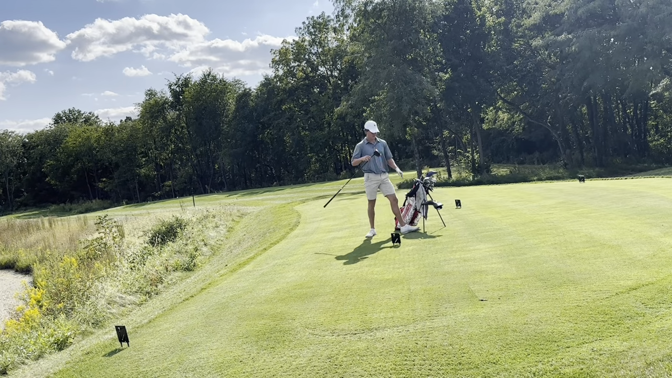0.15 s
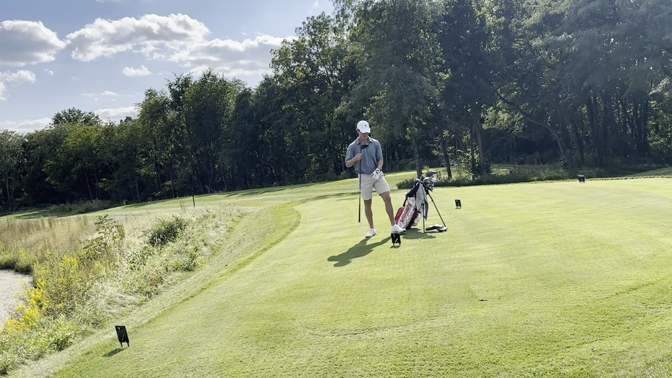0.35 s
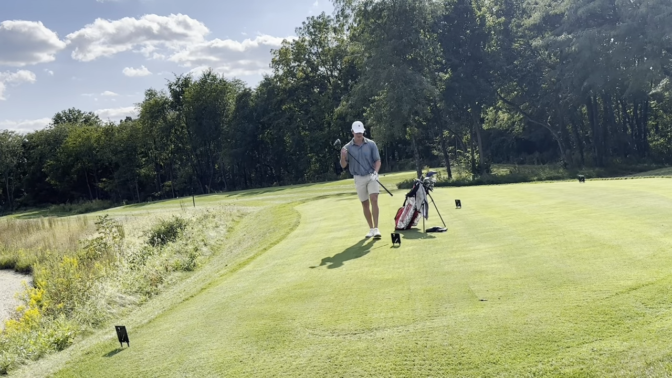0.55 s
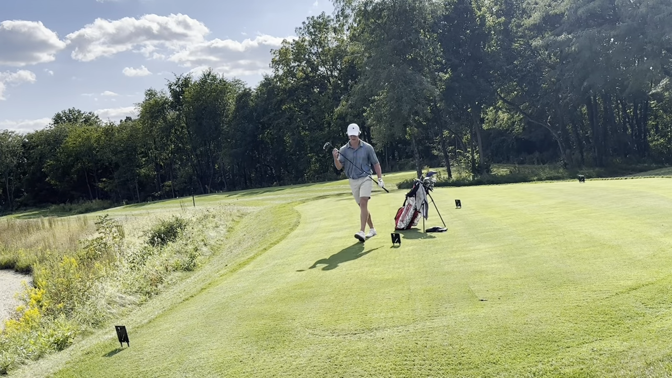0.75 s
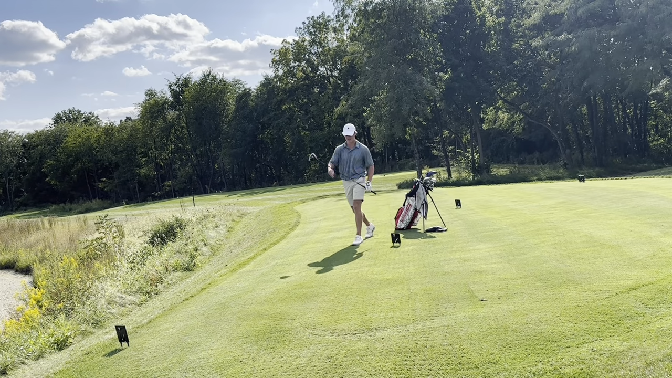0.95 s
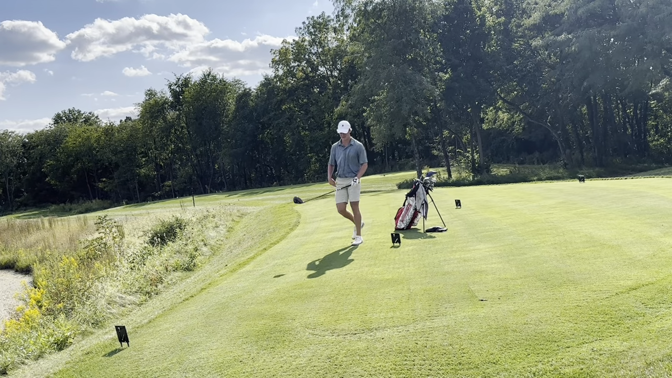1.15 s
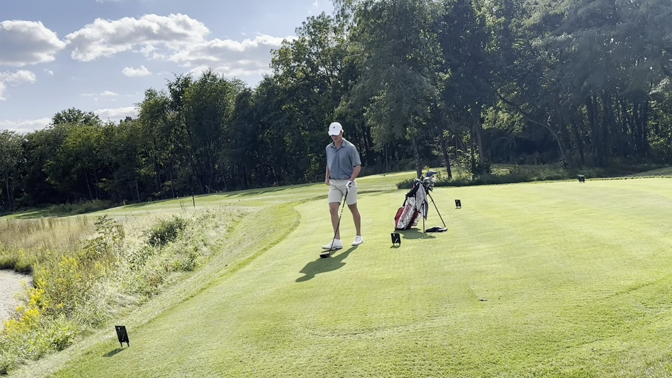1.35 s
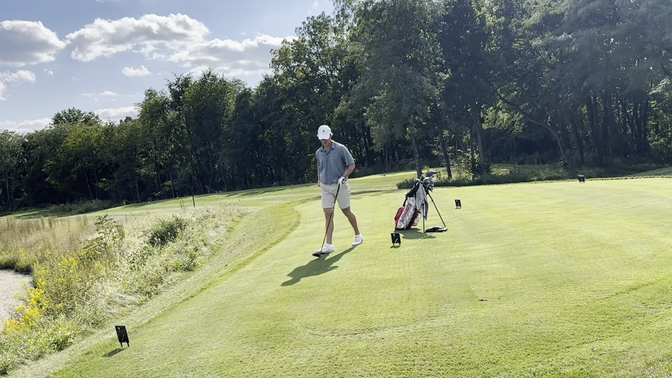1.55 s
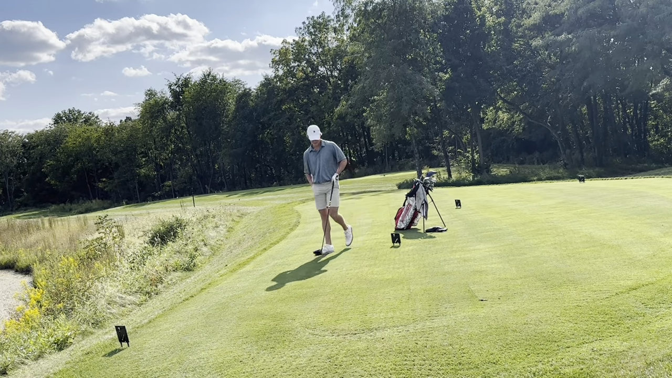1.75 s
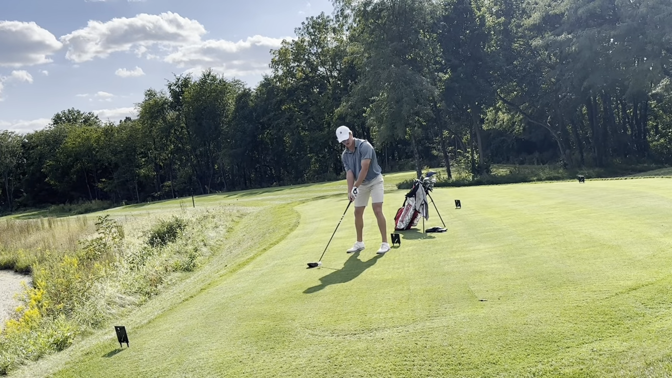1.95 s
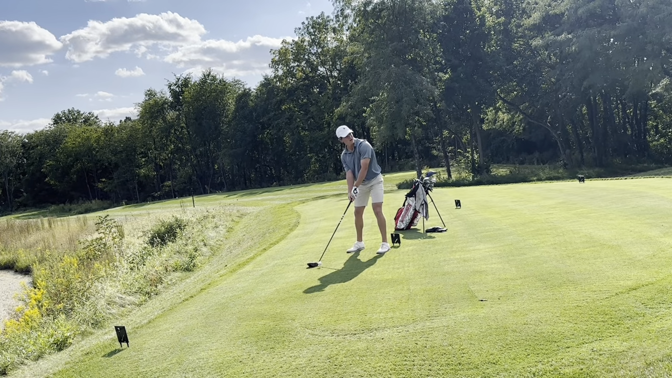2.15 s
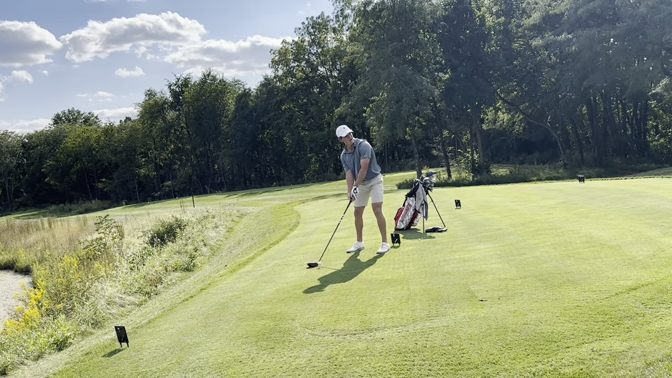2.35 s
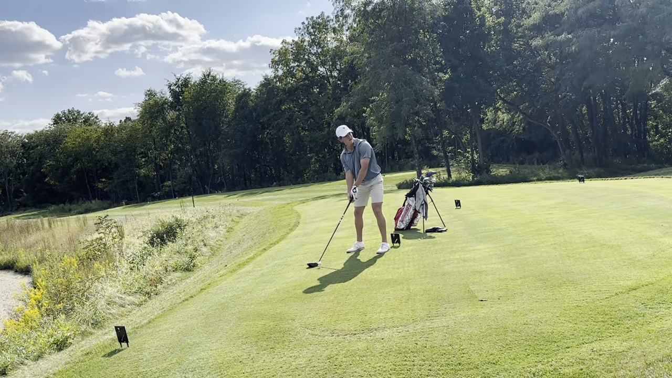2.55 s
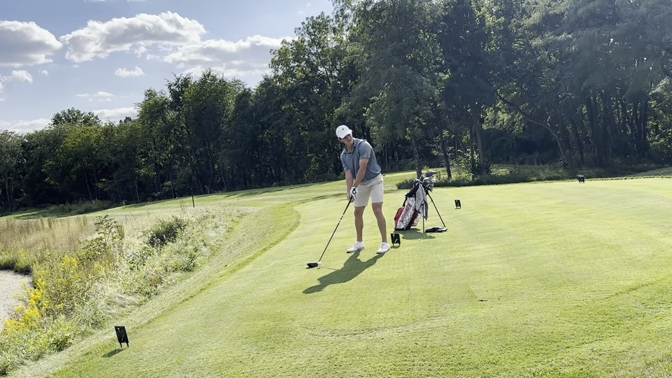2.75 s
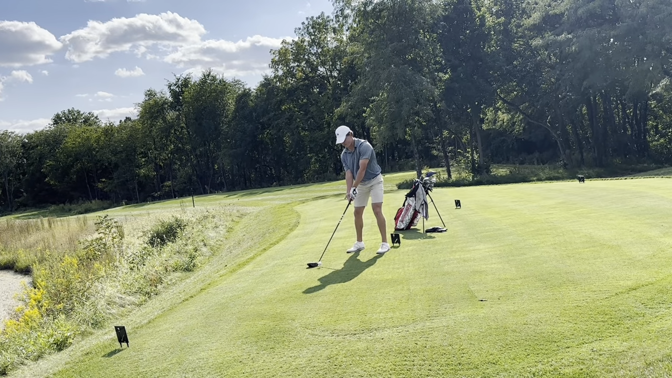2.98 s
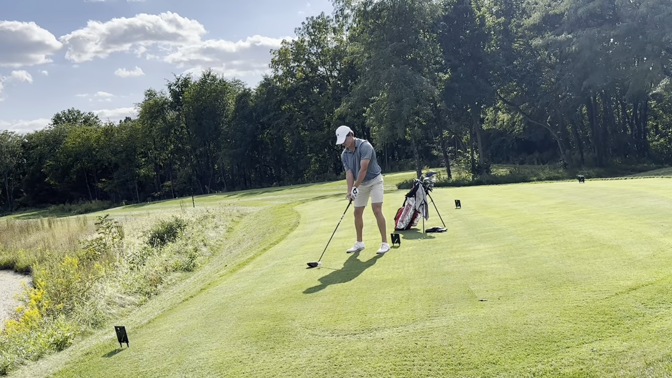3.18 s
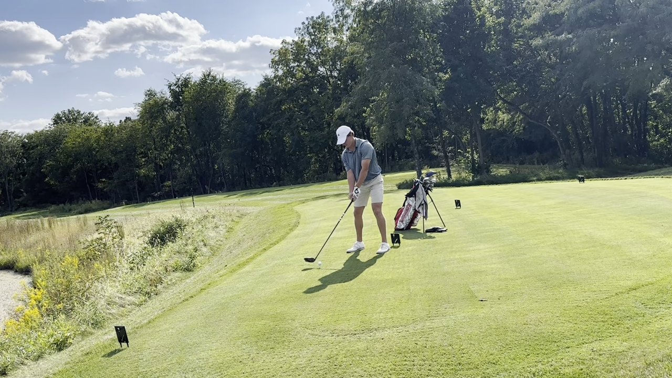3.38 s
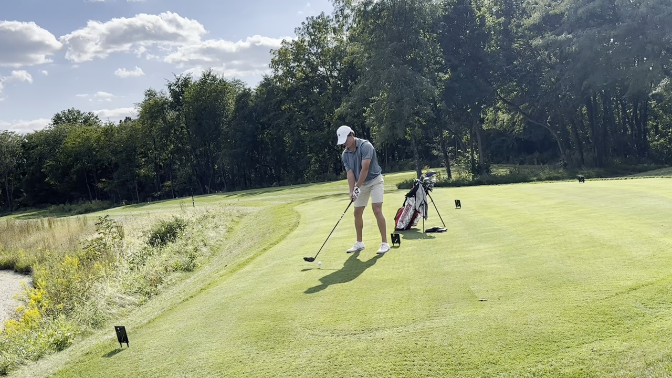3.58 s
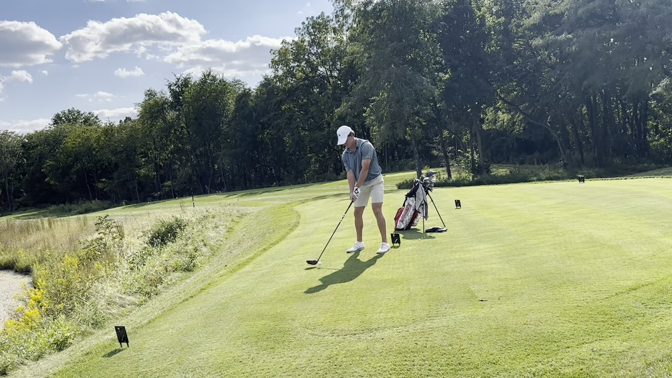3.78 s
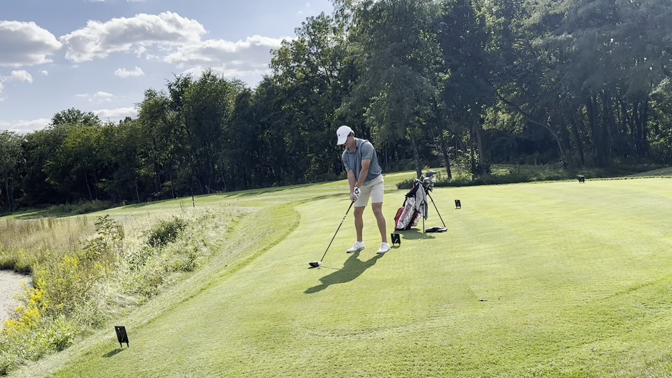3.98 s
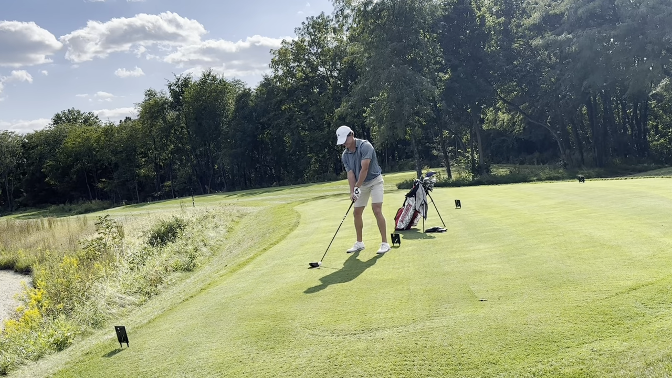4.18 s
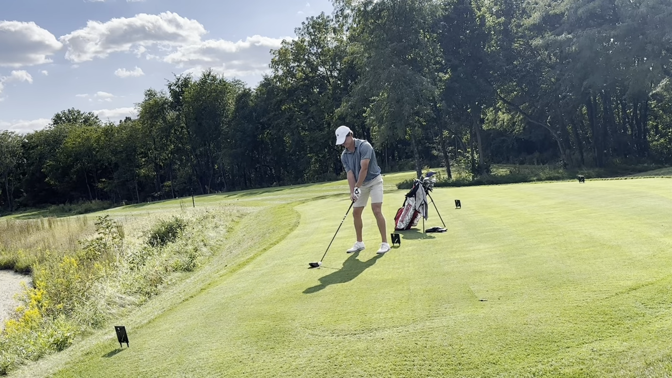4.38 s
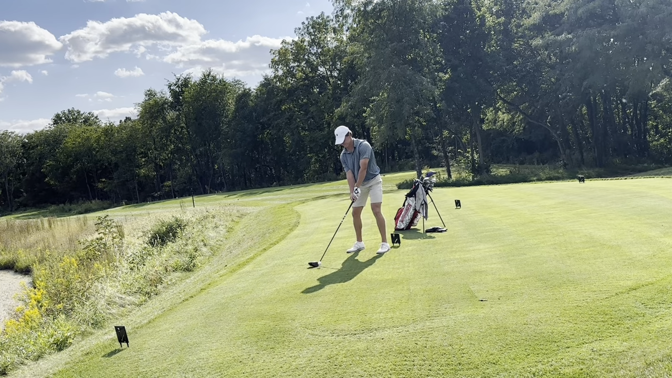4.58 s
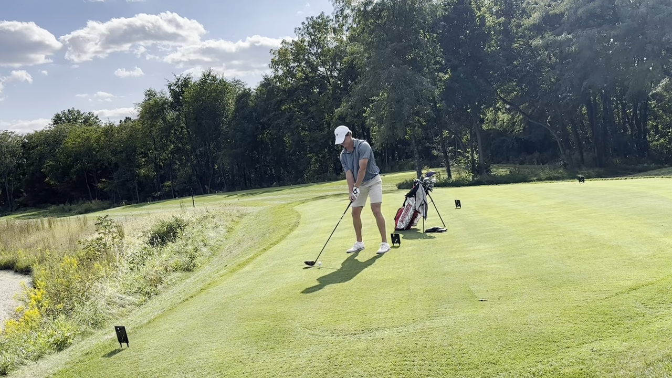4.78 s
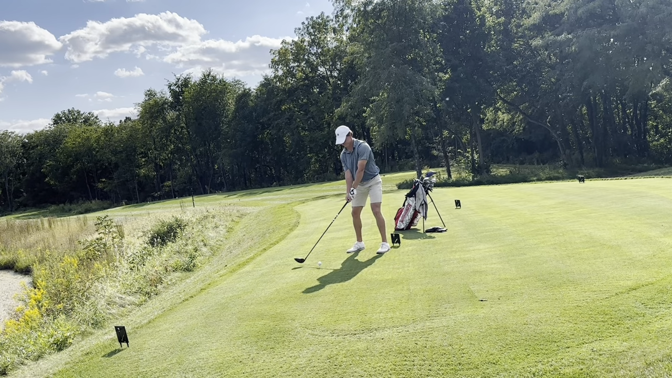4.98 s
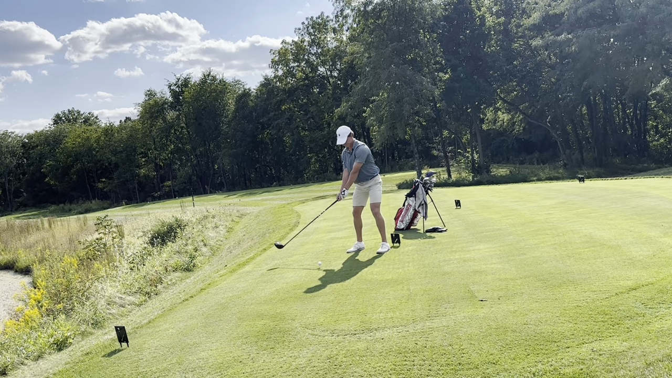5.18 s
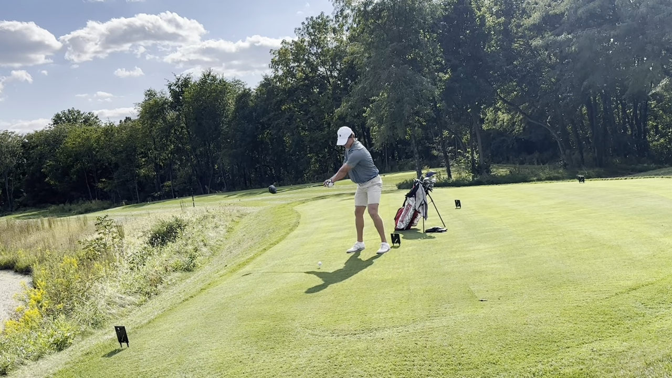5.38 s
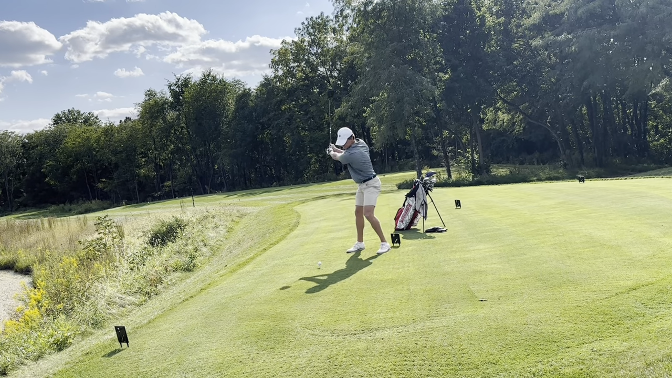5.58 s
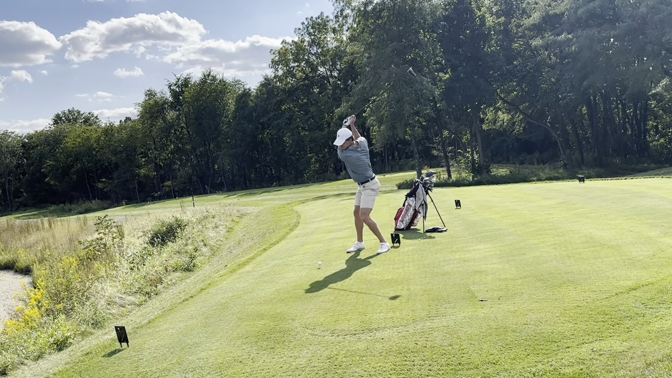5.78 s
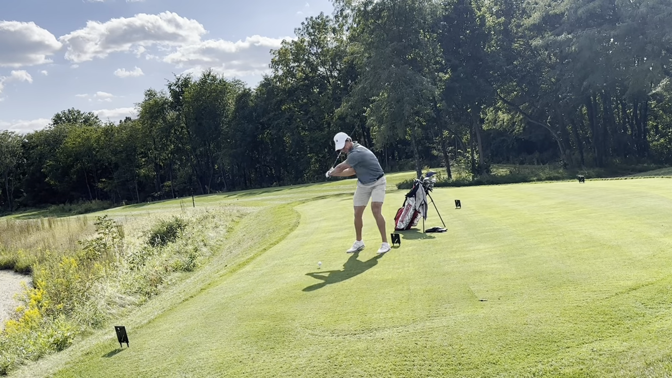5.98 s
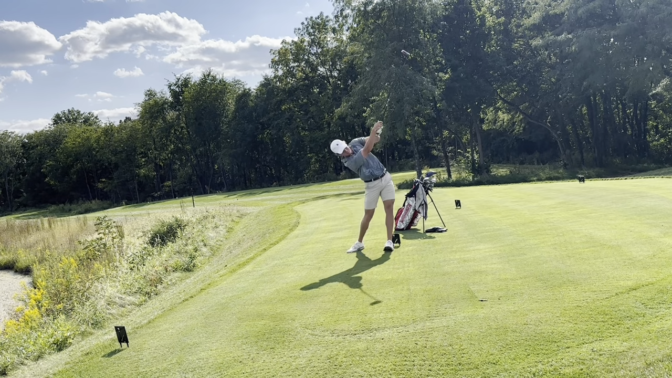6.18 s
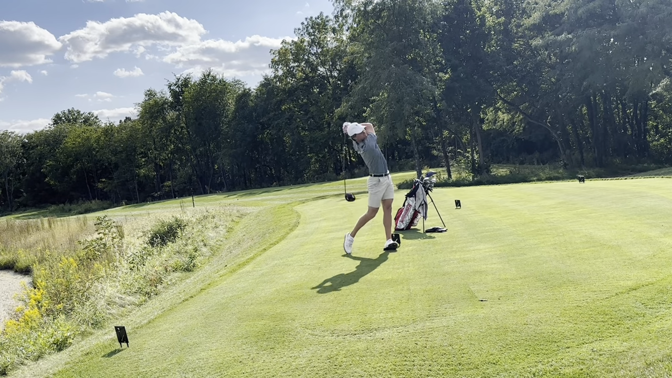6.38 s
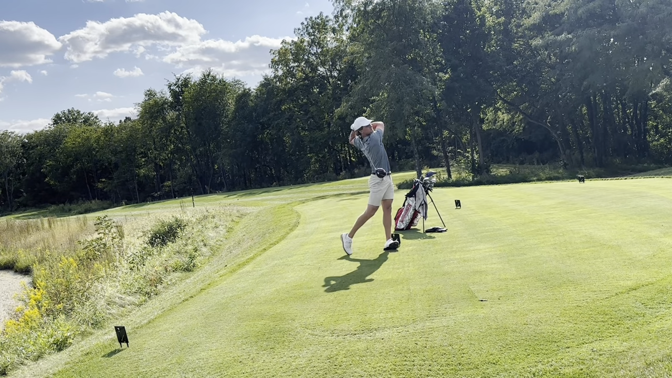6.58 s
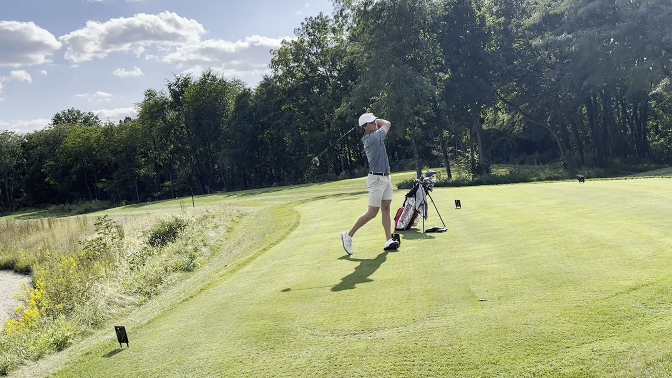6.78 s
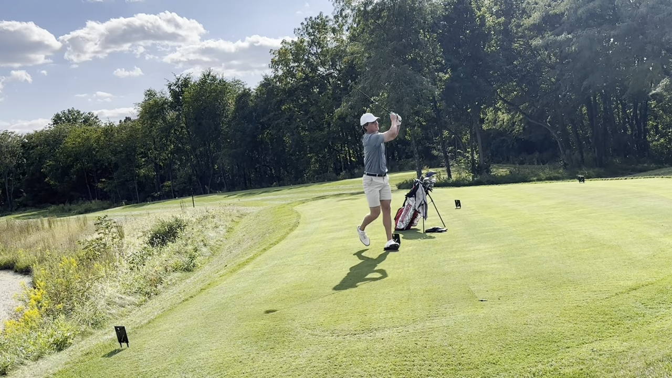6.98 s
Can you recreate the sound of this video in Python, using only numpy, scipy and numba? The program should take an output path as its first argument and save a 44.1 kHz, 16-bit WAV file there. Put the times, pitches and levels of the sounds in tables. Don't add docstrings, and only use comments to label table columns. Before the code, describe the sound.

A quiet, sunny tee box heard in stereo from some metres away. From 0 s, faint hiss and far traffic lie under high crickets: a steady trill, quick repeated chirps and a distant chorus. Soft low wind bumps and flutters press on the microphone, most crowded in the first second. Tiny dry scuffs and ticks from bag and clubs come at about 0.3, 0.7, 1.25 and 1.35 s. At 1.85 s the sound dips for an instant and the trilling changes. Gusts thump near 2.2 and 4.8 to 5 s; leaves hiss slightly brighter around 3.8 s. A stronger rumble swells at 5.9 s. At about 6.03 s a short swish rises in pitch, and at 6.08 s the driver cracks the ball: very loud, sharp, bright and hollow-metallic, gone in milliseconds. A diffuse echo returns from banks and trees for a few tenths, leaving a faint tail, crickets and gusts until 7 s.

```python
import sys
import numpy as np
from scipy import signal
from scipy.fft import rfft, irfft, next_fast_len
from scipy.io import wavfile
from numba import njit

SR = 44100
rng = np.random.default_rng(int(sys.argv[2]) if len(sys.argv) > 2 else 0)


def wav_record(signal):
    frames = np.transpose(np.atleast_2d(signal))
    bounded = np.clip(frames, -1, 1)
    quanta = np.round(bounded * 32767).astype(np.int16)
    wavfile.write(sys.argv[1], SR, quanta)


def elevation(decibels):
    levels = np.asarray(decibels, float)
    return 10 ** (levels / 20)


N = 310023
IMPACT_S = 6.0835


def in_time(rows):
    s, *columns = np.transpose(rows)
    return [np.interp(np.arange(N) / SR, s, c) for c in columns]


def rms_one(x):
    return x / np.sqrt(np.mean(x ** 2) + 1e-20)


def coloured(spectrum, channels=1):
    hz, db = np.transpose(spectrum)
    size = next_fast_len(N)
    log_bins = np.log(np.arange(size // 2 + 1) * SR / size + 1)
    gain = elevation(np.interp(log_bins, np.log(hz), db, left=-90, right=-90))
    white = rng.standard_normal((channels, size))
    return rms_one(irfft(rfft(white) * gain, size)[:, :N])


def drift(rate):
    r = np.exp(-80 * np.pi * rate / SR)
    steps = rng.standard_normal(N // 40 + 2002)
    slow = signal.lfilter([1], [1, -2 * r, r * r], steps)[2000:]
    return np.interp(np.arange(N) / 40, np.arange(len(slow)), rms_one(slow))


def glides(rows, bend):
    out = np.zeros(N)
    for start, length, first_hz, last_hz, db in rows:
        u = np.arange(int(length * SR)) / (length * SR)
        pitch = last_hz + (first_hz - last_hz) * (1 - u) ** bend
        shape = np.minimum(u / .12, 1) * (1 - u) ** .8
        tone = np.sin(2 * np.pi * np.cumsum(pitch) / SR)
        out[int(start * SR):][:len(u)] += elevation(db) * shape * tone
    return out


def mid_side(mid, side):
    return np.array([mid + side, mid - side])


# frequency in Hz, level in dB.
PORT_DIFFERENCE = [(60, -4.5), (700, 0.5), (2300, -13.5), (4000, 6), (6000, -13.5), (8200, 9.5),
                   (10200, -3.5), (12000, -16), (14500, 0), (17000, -3)]


def housing(side, lag=None):
    hz, db = np.transpose(PORT_DIFFERENCE)
    size = next_fast_len(N, True)
    bins = np.arange(size // 2 + 1) / size
    turn = 1 if lag is None else -1j * np.sin(np.pi * bins * lag)
    colour = elevation(np.interp(np.log(bins * SR + 1), np.log(hz), db))
    return irfft(turn * colour * rfft(side, size), size)[:N]


def ports(x, lag):
    return mid_side(x, housing(x, lag))


# frequency in Hz, level in dB per Hz.
AIR_COMMON = [(35, -29), (60, -9.5), (315, -9.5), (605, -9), (1140, -22), (2460, -29), (3200, -26.5),
              (3740, -16), (4700, -25), (5150, -14.5), (5690, -13), (8200, -16.5), (9300, -26),
              (15650, -31.5)]
# frequency in Hz, level in dB per Hz.
AIR_DIFFERENCE = [(35, -31.5), (60, -11), (287, -13.5), (591, -2.5), (1080, -11.5), (1470, -27.5),
                  (1690, -46), (3180, -34.5), (3740, -13), (5960, -25), (8270, -5.5), (9740, -27),
                  (13200, -56), (14100, -22.5), (15900, -26)]
# time in seconds, level in dB.
LEAF_HISS = [(0, -84), (2.9, -86), (3.8, -76), (4.5, -86), (5.6, -91), (7.03, -84)]


def air():
    leaves = coloured([(8500, -29.5), (10500, -7.5), (15600, 6.0)])[0]
    leaves = leaves * elevation(in_time(LEAF_HISS)[0])
    mid = elevation(-63.5) * coloured(AIR_COMMON)[0] + leaves
    side = elevation(-64) * coloured(AIR_DIFFERENCE)[0]
    return mid_side(mid, side)


# peak in seconds, half width in seconds, rumble in dB,
# flutter above 120 Hz in dB relative to the rumble.
GUST_SWELLS = [(0.0, 0.046, -45.5, -22), (.13, 0.027, -48.5, -12), (.23, .025, -45, -12),
               (.38, 0.1, -48, -9.5), (.53, 0.047, -42, -10.5), (.65, 0.047, -55, -11),
               (.77, 0.025, -60.5, -22), (.98, 0.088, -56.5, -12), (1.37, 0.025, -53, -1),
               (1.45, .04, -50.5, -20), (1.55, 0.028, -53.5, -14), (1.82, 0.041, -56, -7.5),
               (2.14, 0.052, -47, -19), (2.229, .035, -38.5, -13.5), (2.34, 0.032, -52, -12),
               (2.64, 0.044, -66, -19), (3.35, 0.045, -63, -13), (3.55, 0.11, -55.5, -11),
               (3.82, 0.061, -55, -25), (4.4, 0.07, -46, -9), (4.62, 0.039, -56, -13),
               (4.76, 0.019, -42, -19), (4.97, 0.049, -41, -23), (5.35, 0.39, -60.5, -8.5),
               (5.78, 0.067, -50.5, -21), (5.938, 0.069, -35, -17.5), (6.245, .035, -40.5, -33),
               (6.48, 0.24, -50, -11.5), (6.789, 0.11, -41.5, -19.5), (7.0, 0.044, -37, -10)]
# frequency in Hz, level in dB per Hz.
RUMBLE_COLOUR = [(15, -40.5), (28, -18), (42, -1.5), (60, 3), (92, -2), (125, -14), (170, -29.5),
                 (250, -51)]
# frequency in Hz, level in dB per Hz.
FLUTTER_COLOUR = [(70, -16.5), (130, 7), (220, -5), (350, -17.5), (600, -27)]
# start in seconds, first pitch in Hz, level in dB.
EDDY_POPS = [(0.272, 425, -40.5), (.476, 428, -46.5), (1.36, 302, -47), (1.535, 224, -49),
             (2.213, 290, -39.5), (4.372, 238, -38)]
CALM_DB, CALM_FLUTTER_DB = -68.5, -75.5
POP_CYCLES, POP_FALLS_TO, POP_BEND = 7.9, 0.405, 1.61


def wind():
    s, width, db, flutter_db = np.transpose(GUST_SWELLS)[:, :, None]
    t, steps = np.arange(N) / SR, np.arange(0, N + 100, 100) / SR
    bell = np.exp(-((steps - s) / width) ** 2)
    rumble = np.interp(t, steps, elevation(CALM_DB) + np.sum(elevation(db) * bell, axis=0))
    flutter = np.interp(t, steps, elevation(CALM_FLUTTER_DB) + np.sum(elevation(db + flutter_db) * bell, axis=0))
    low = coloured(RUMBLE_COLOUR, channels=2) * rumble * elevation(1.2 * drift(4.0))
    high = coloured(FLUTTER_COLOUR, channels=2) * flutter * elevation(1.83 * drift(25.2))
    mid, side = low + high
    pops = [(s, POP_CYCLES / hz, hz, POP_FALLS_TO * hz, db) for s, hz, db in EDDY_POPS]
    return mid_side(mid, elevation(-11.5) * side) + glides(pops, POP_BEND)


def strokes(phase, share):
    return np.sin(np.pi * np.clip(phase % 1 / share, 0, 1))


def cricket(chirps, hz, per_s, gain_db, sag, count):
    out, t = np.zeros(N + SR), np.arange(int(count / per_s * SR)) / SR
    swell = 1.1 + 0.93 * np.sin(np.pi * t / t[-1])
    for (s, db), (detune, turn) in zip(chirps, rng.standard_normal((len(chirps), 2))):
        pitch = hz * (1 + .004 * detune - sag * (t * per_s % 1))
        tone = np.sin(2 * np.pi * np.cumsum(pitch) / SR + turn)
        chirp = swell * strokes(t * per_s, 0.54) * tone
        out[int(s * SR):int(s * SR) + len(t)] += elevation(db + gain_db) * chirp
    return out[:N]


def chorus(count):
    low_hz, high_hz = 5257, 6304
    out = 0
    for pitch, pace, start, side, loud in rng.random((count, 5)):
        chirps = [(s, 8 * loud) for s in np.arange(.4 * start, N / SR, 0.25 + .15 * pace)]
        hz = low_hz + (high_hz - low_hz) * pitch
        one = cricket(chirps, hz, 26 + 8 * pitch, 0, .05, count=4)
        out = out + mid_side(one, .5 * (side - .5) * np.roll(one, 2))
    return elevation(-67.5) * rms_one(out)


# pitch in Hz, fall within a stroke in Hz, strokes per second,
# open share of the stroke from 0 to 1, lag between the ports in samples.
TRILLER_VOICES = [(3850, 400, 66.0, .7, 1.3), (4400, 240, 93.0, .65, -1.2), (8260, 200, 19.9, .3, 2.3),
                  (4250, 1050, 65.4, .85, -1.1), (4420, 60, 45.0, .9, .6)]
# start in seconds, stop in seconds, first level in dB, last level in dB.
TRILL_SPANS = [(2.03, 8, -77.5, -77.5), (2.85, 7.3, -79, -70.5), (-1, 8, -81.5, -79),
               (-1, 1.86, -69.5, -77.5), (2.5, 2.76, -77, -79)]
TRILL_FADE_S = 0.027


def trillers():
    out, t = 0, np.arange(N) / SR
    for (hz, sag_hz, per_s, share, lag), span in zip(TRILLER_VOICES, TRILL_SPANS):
        start, stop, first_db, last_db = span
        singing = np.clip(np.minimum(t - start, stop - t) / TRILL_FADE_S, 0, 1)
        level_db = np.interp(t, [start, stop], [first_db, last_db])
        level_db = level_db + 0.66 * drift(3) + 0.64 * drift(40)
        phase = np.cumsum(per_s * (1 + .008 * drift(.7))) / SR
        pitch = hz * (1 + .004 * drift(30.12)) - sag_hz * np.minimum(phase % 1 / share, 1)
        wing = np.sin(2 * np.pi * np.cumsum(pitch) / SR) * strokes(phase, share)
        out = out + ports(singing * elevation(level_db) * rms_one(wing), lag)
    return out


# start in seconds, level in dB.
HIGH_CRICKET = [(0.14, -69), (0.528, -71.5), (0.901, -74), (1.268, -68), (1.654, -65), (2.223, -72),
                (2.755, -70.5), (3.123, -84), (3.782, -76), (4.176, -79), (4.487, -72), (4.824, -70.5),
                (5.143, -68.5), (5.527, -66), (5.859, -68), (6.598, -71.5), (6.918, -74.5)]
# start in seconds, level in dB.
LOW_CRICKET = [(0.016, -71), (0.26, -73), (0.548, -76), (0.808, -73), (1.12, -75), (1.355, -72.5),
               (1.605, -73), (2.06, -72), (2.388, -71), (2.705, -72), (3.015, -74), (3.264, -82),
               (3.772, -80), (4.045, -74), (4.364, -73), (4.583, -74), (4.891, -71), (5.191, -73),
               (5.394, -79), (5.665, -71), (6.516, -70), (6.885, -76)]
# start in seconds, level in dB.
TOP_CRICKET = [(0.015, -86), (0.493, -78), (0.893, -82), (1.672, -75), (2.164, -80), (2.704, -77),
               (3.266, -88), (4.152, -78), (4.786, -79), (5.24, -77), (5.848, -77), (6.496, -90.5),
               (6.917, -85.5)]


def near_crickets():
    high = cricket(HIGH_CRICKET, hz=5830, per_s=30.4, gain_db=4.0, sag=0.0202, count=5)
    high += cricket(TOP_CRICKET, hz=6530, per_s=30.0, gain_db=7, sag=.02, count=4)
    low = cricket(LOW_CRICKET, hz=5120, per_s=25.5, gain_db=1.0, sag=.1, count=4)
    return ports(high, 0.45) + ports(low, 1.5)


# start in seconds, length in seconds, level in dB,
# lower edge in Hz, upper edge in Hz.
BAG_SCUFFS = [
    (.003, .03, -75.5, 900, 3200),
    (0.261, 0.035, -64, 600, 3300),
    (.677, .008, -62, 9000, 15500),
    (1.247, .014, -69, 1500, 2800),
    (1.352, .012, -61.5, 9000, 15400),
]


def knocks():
    out, noise = np.zeros(N), rng.standard_normal(N)
    for s, length, db, low_hz, high_hz in BAG_SCUFFS:
        at, size = int(s * SR), int(length * SR)
        sos = signal.butter(2, [low_hz, high_hz], "band", fs=SR, output="sos")
        band = signal.sosfilt(sos, noise[at:at + size])
        out[at:at + size] += elevation(db - 2.5) * rms_one(band) * np.hanning(size)
    return out


@njit
def sweep(noise, hz, r, sr):
    out = np.zeros(len(noise))
    for i in range(2, len(noise)):
        w = 2 * np.pi * hz[i] / sr
        out[i] = np.sin(w) * noise[i] + 2 * r * np.cos(w) * out[i - 1] - r * r * out[i - 2]
    return out


# time in seconds, shedding pitch of the shaft in Hz,
# whistle in dB.
CLUB_SWING = [(5.99, 484, -89), (6.03, 650, -57.5), (6.045, 740, -48), (6.06, 1120, -36.5),
              (6.082, 1360, -30.5), (6.09, 997, -45), (6.115, 878, -44.5), (6.145, 602, -48.5),
              (6.22, 390, -64.5)]
# frequency in Hz, level in dB per Hz.
TURBULENCE_COLOUR = [(300, -10.5), (1000, 1.5), (2500, -7), (5000, -8), (10000, -23.5), (16000, -22)]
TURBULENCE_DB, TURBULENCE_DB_PER_OCTAVE = -48, 28.5


def swing():
    hz, whistle_db = in_time(CLUB_SWING)
    turbulence_db = TURBULENCE_DB + TURBULENCE_DB_PER_OCTAVE * np.log2(hz / 1000)
    bandwidth_hz = 130
    whistle = sweep(rng.standard_normal(N), hz, np.exp(-np.pi * bandwidth_hz / SR), SR)
    rush = elevation(turbulence_db) * coloured(TURBULENCE_COLOUR)[0]
    near = np.abs(np.arange(N) / SR - IMPACT_S) < .2
    return near * (elevation(whistle_db) * rms_one(whistle) + rush)


# delay in seconds, depth in seconds, t60 in seconds,
# level in dB, treble in dB relative to the lows.
SCATTERERS = [
    (0, .0008, .01, -36.5, 19),
    (.003, 0.016, .1, -51, 8),
    (.014, .066, 0.069, -48, -3),
    (.09, 0.046, .2, -59, -2),
    (.145, 0.069, 0.19, -56.5, 4.5),
    (.2, .08, 1.9, -60.5, -5.5),
]
# frequency in Hz, level in dB per Hz.
CRACK_COLOUR = [(240, -31), (400, -2.5), (675, -5), (1230, -13.5), (1330, -11.5), (1550, -12), (2620, -8.5),
                (4560, -11.5), (5010, -4), (8200, -15), (9860, -10), (14000, -29.5), (15900, -38)]
ECHO_RISE_SHARE = 0.087


def echoes():
    noise = coloured(CRACK_COLOUR, channels=2)
    dull = signal.sosfilt(signal.butter(2, 3500, fs=SR, output="sos"), noise)
    low_power, high_power = np.zeros((2, N))
    for delay, depth, t60, db, treble_db in SCATTERERS:
        since = np.arange(N) / SR - IMPACT_S - delay
        rise = np.clip(since / (ECHO_RISE_SHARE * depth), 0, 1)
        shape = rise * elevation(db - 60 * np.maximum(since - depth, 0) / t60)
        low_power = low_power + shape ** 2
        high_power = high_power + (elevation(treble_db) * shape) ** 2
    mid, side = np.sqrt(low_power) * dull + np.sqrt(high_power) * (noise - dull)
    return mid_side(mid, elevation(-2.5) * housing(side))


def spray():
    since = np.maximum(np.arange(N) / SR - IMPACT_S, 0)
    fade = (since > 0) * np.exp(-since / .0045)
    return elevation(-25) * fade * coloured(CRACK_COLOUR)[0]


def ring(clicks, hz, t60):
    r, w = elevation(-60 / (t60 * SR)), 2 * np.pi * hz / SR
    return signal.lfilter([0, np.sin(w)], [1, -2 * r * np.cos(w), r * r], clicks + 1e-18)


# delay in ms, pitch in Hz, level in dB, t60 in seconds.
HEAD_MODES = [(.12, 11000, -5.5, .004), (.3, 13000, -12, 0.0026), (0.22, 10000, -12, .005),
              (.05, 15000, -28, .003), (.25, 16000, -13.5, .003), (.75, 6080, -13, 0.012),
              (0.75, 4090, -10, 0.0084), (.5, 6600, -11.5, 0.0097), (0.3, 12300, -16, .003),
              (.9, 1200, -21.5, 0.0075)]
# delay in ms, pitch in Hz, level in dB, t60 in seconds.
BALL_PUSH = [
    (.68, 2100, -1.5, .0022),
    (1.0, 520, -18, .006),
]
# start in seconds, length in seconds, first pitch in Hz,
# last pitch in Hz, level in dB.
SINGING_SHAFT = [(6.054, 0.028, 1040, 1200, -26), (6.024, 0.0313, 637, 760, -44)]
# start in seconds, length in seconds, first pitch in Hz,
# last pitch in Hz, level in dB.
FLEEING_RING = [(6.0945, .0115, 4195, 3650, -22.5)]
# start in seconds, length in seconds, first pitch in Hz,
# last pitch in Hz, level in dB.
AFTER_BLOW = [
    (6.0853, .014, 449.5, 110, -26.5),
    (6.093, .08, 2390, 2034, -47.5),
    (6.1, .05, 3520, 3050, -52),
]


def strike():
    out = glides(SINGING_SHAFT, 1.05) + glides(FLEEING_RING, .3) + glides(AFTER_BLOW, 1.9)
    out += spray()
    hit = int(IMPACT_S * SR)
    for delay_ms, hz, db, t60 in HEAD_MODES + BALL_PUSH:
        click = np.zeros(SR // 10)
        click[int((IMPACT_S + delay_ms / 1000) * SR) - hit] = -elevation(db)
        out[hit:][:len(click)] += ring(click, hz, t60)
    return out


def scene():
    insects = chorus(count=36) + trillers() + near_crickets()
    stroke = ports(knocks() + swing() + strike(), -1.3)
    return air() + wind() + insects + stroke + echoes()


def roll_off(x):
    return signal.sosfilt(signal.butter(12, 16970, fs=SR, output="sos"), x)


def record(dry):
    change_s, depth, width_s = 1.853, 0.85, 0.0048
    dip = 1 - depth * np.exp(-((np.arange(N) / SR - change_s) / width_s) ** 2)
    rounded = 0.93 * np.tanh(dry * dip / 0.97)
    top_cut = signal.cheby2(10, 30, 16900, fs=SR, output="sos")
    mix = signal.sosfiltfilt(top_cut, rounded)
    return roll_off(mix)


dry = scene()
out = record(dry)
wav_record(out)
```